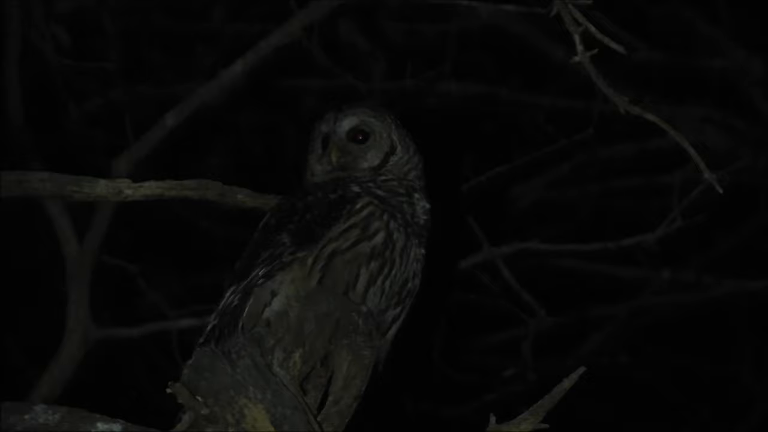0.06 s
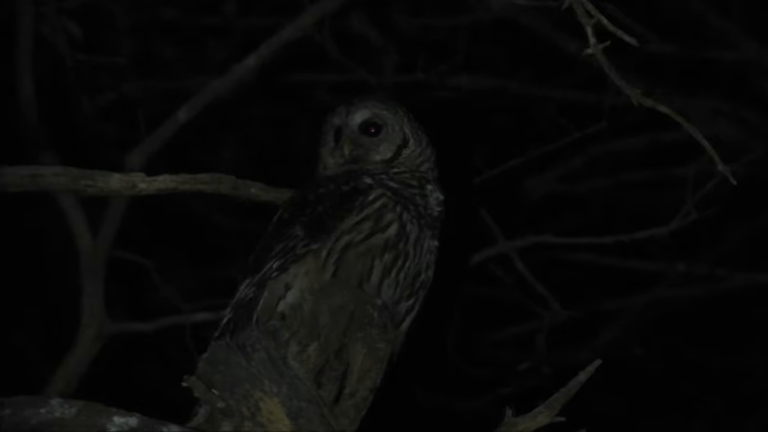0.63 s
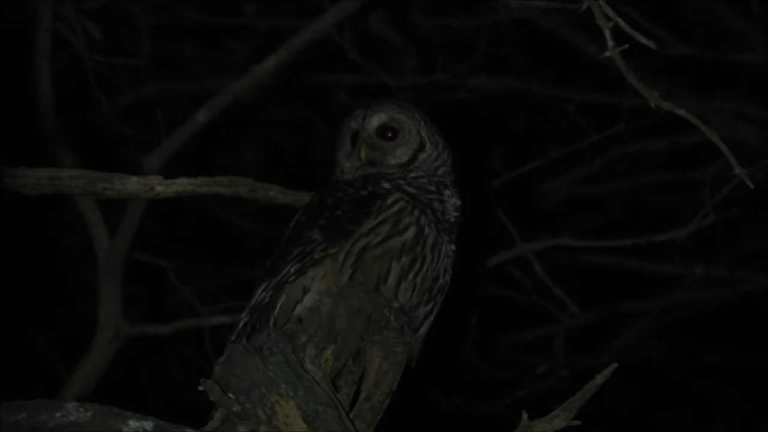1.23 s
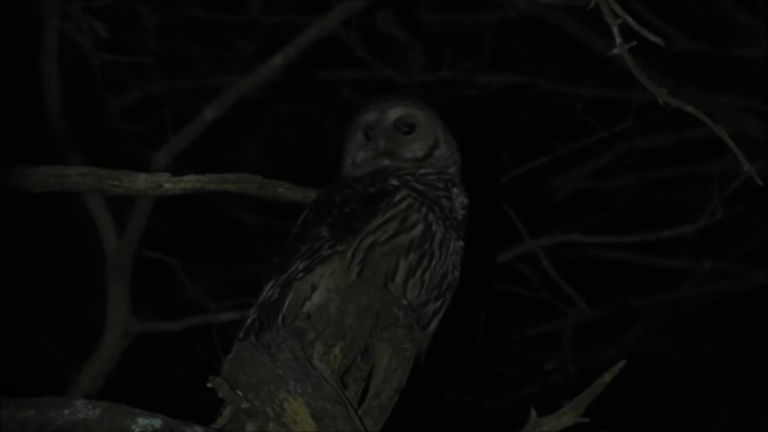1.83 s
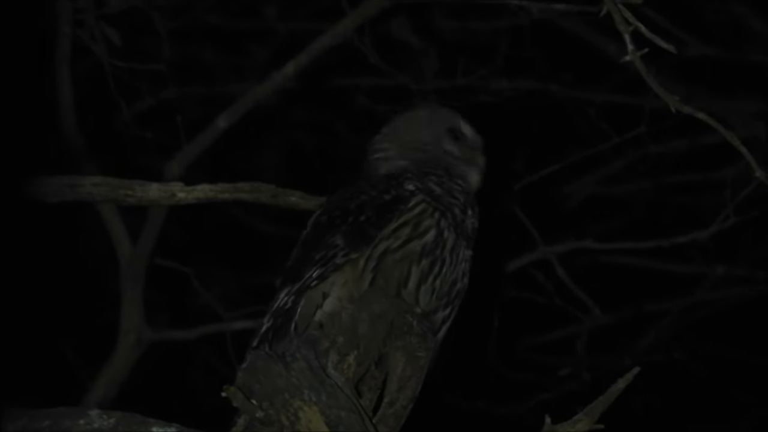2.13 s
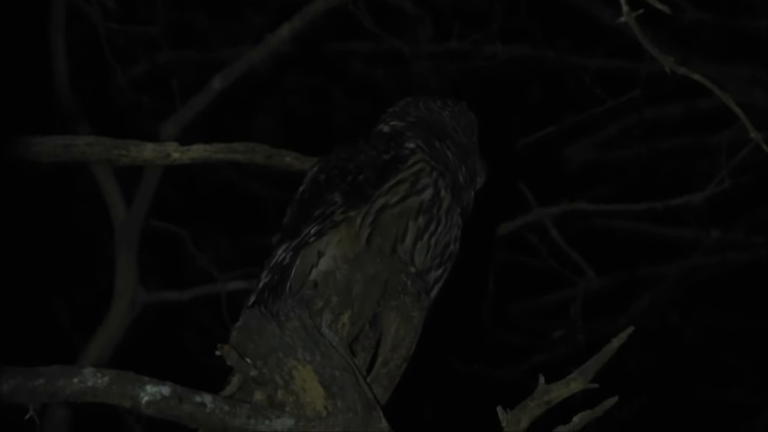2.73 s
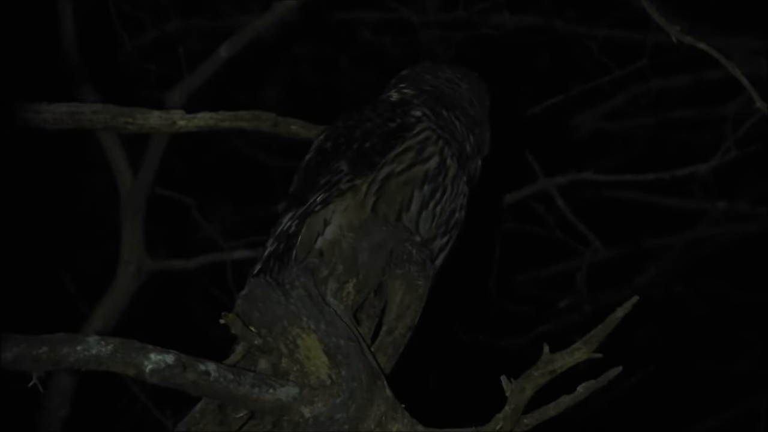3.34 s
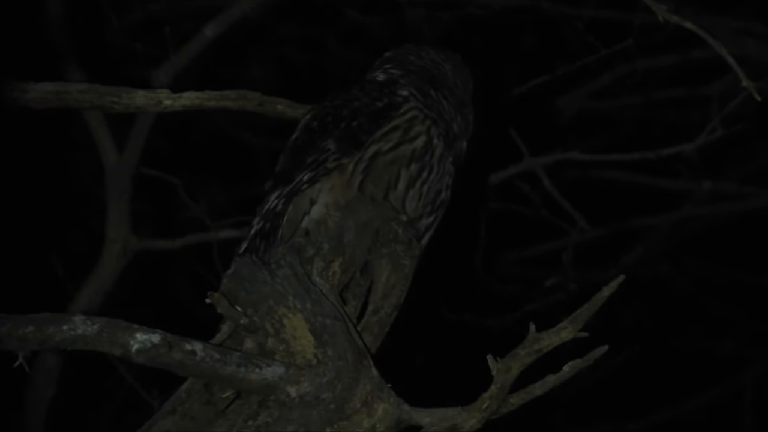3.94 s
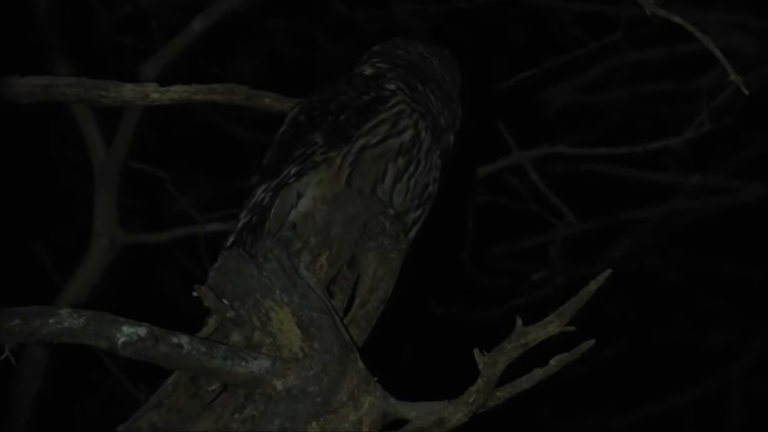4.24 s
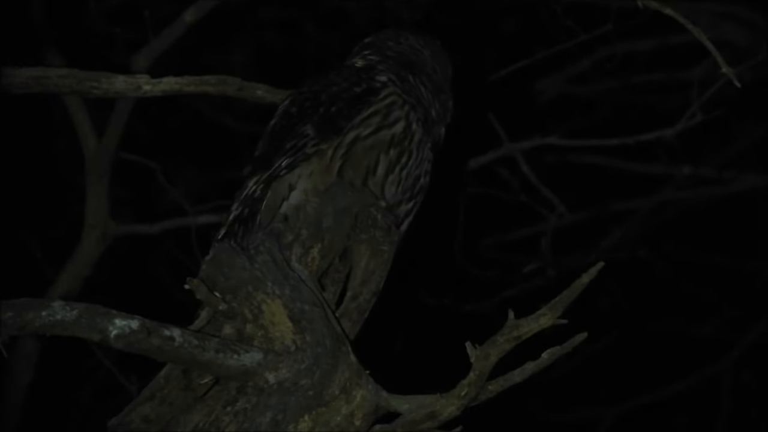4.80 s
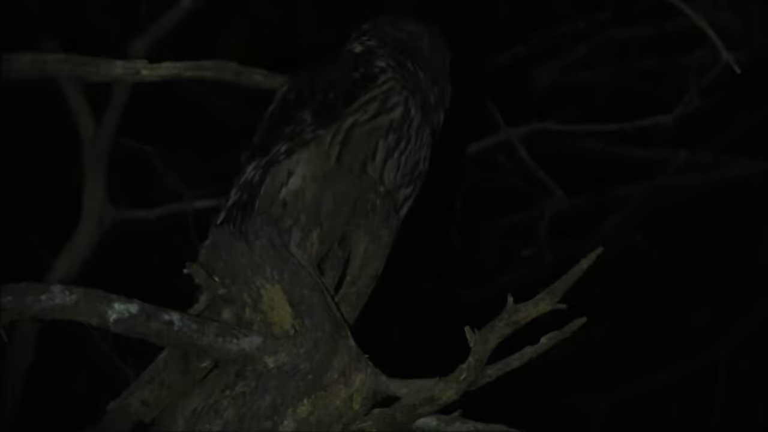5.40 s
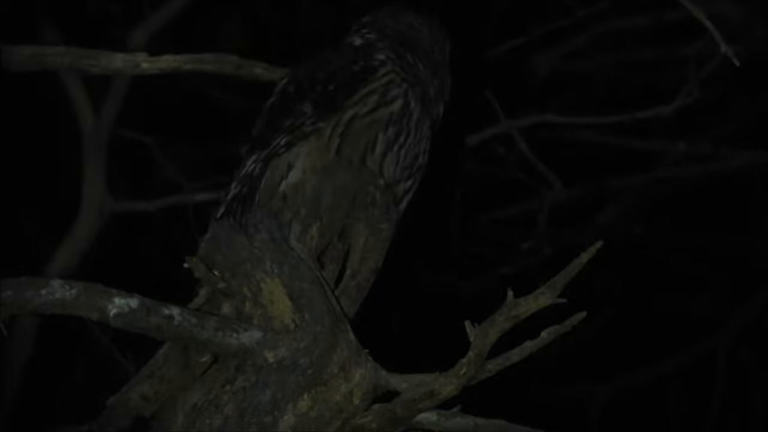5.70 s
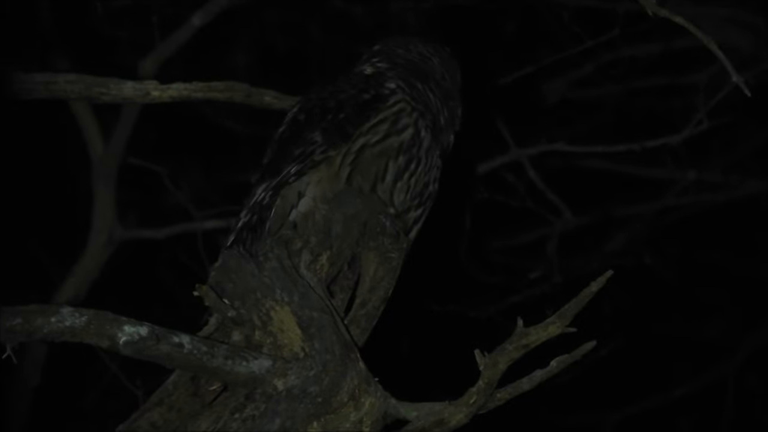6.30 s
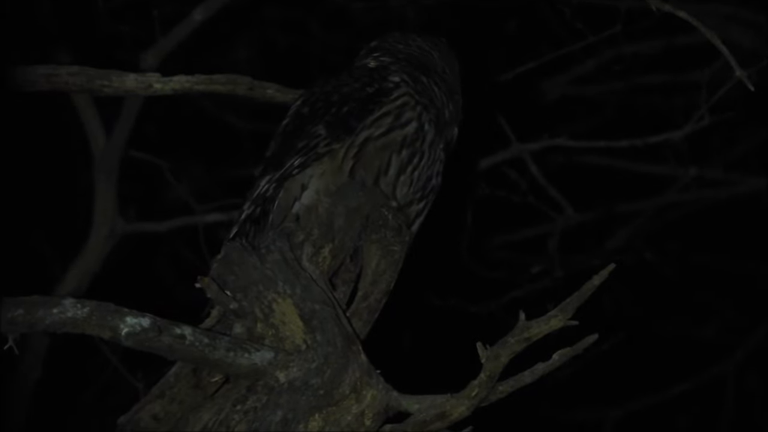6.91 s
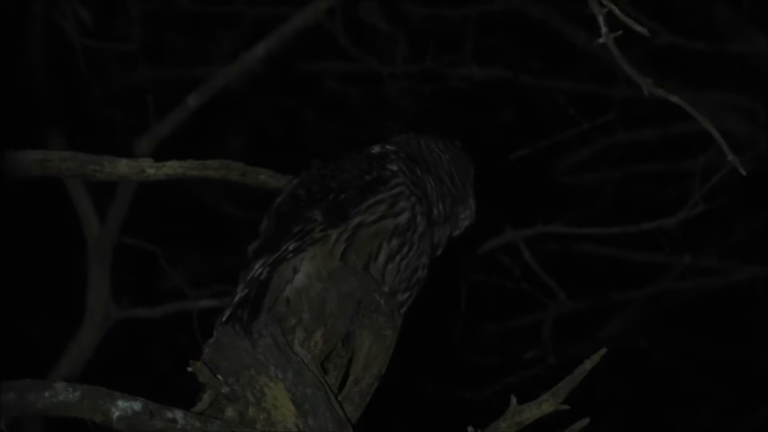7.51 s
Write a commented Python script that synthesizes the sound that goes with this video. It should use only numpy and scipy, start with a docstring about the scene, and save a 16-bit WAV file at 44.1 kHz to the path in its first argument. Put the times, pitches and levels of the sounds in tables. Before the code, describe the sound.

A small zoom motor whirs unevenly next to a stereo microphone for about a second, while frogs are already peeping in the surrounding night woods. Their brief, shrill, upward whistles alternate and overlap from different distances, each leaving an echoing tail. The nearest frog sounds only once, after about five seconds. A faint far chorus, distant rumble, light hiss and softly swelling background noise continue throughout.

```python
"""A wood at night, on a camera's stereo microphone. From the start, over a low distant rumble, faint hiss
and a soft low-mid noise that swells and dips, spring peepers call in turn against a faint far chorus.
Through the first second the zoom motor whines, right by the microphone. Then the frogs carry on, six in
all, near and far: each peep is a short rising whistle from a vocal sac, which the trees scatter into a
long tail. The nearest frog calls just once, at about 5.4 s."""
import sys
import numpy as np
from scipy import signal
from scipy.fft import rfft, irfft, next_fast_len
from scipy.io import wavfile

SR = 44100
rng = np.random.default_rng(int(sys.argv[2]) if len(sys.argv) > 2 else 0)


def transcribe(u):
    """Save the signal u as a 16-bit wav file named by the first command-line argument.

    u: samples, shape (n,) or (channels, n), limited to [-1, 1]; the rate is SR.
    q: integer samples, one column per channel.
    """
    v = np.clip(np.atleast_2d(u).T, -1, 1)
    q = np.round(v * 32767).astype(np.int16)
    wavfile.write(sys.argv[1], SR, q)


N = 332955


def gain_of(db):
    """Decibels to amplitude."""
    return 10 ** (np.asarray(db) / 20)


def unit_rms(x):
    """Scales to rms 1."""
    return x / np.sqrt(np.mean(x ** 2) + 1e-20)


def at_hz(points, hz):
    """Reads a table on a log-frequency axis."""
    f, value = np.transpose(points)
    return np.interp(np.log(hz + 1), np.log(f + 1), value)


def add(mix, s, sound):
    """Mixes a sound in at s seconds."""
    part = mix[max(round(s * SR), 0):][:len(sound)]
    part += sound[:len(part)]


def drift(count, rate_hz):
    """A slow random wander of rms 1."""
    hz = np.fft.rfftfreq(count, 1 / SR)
    lowpass = np.exp(-(hz / rate_hz) ** 2) * (hz > 0)
    return unit_rms(irfft(rfft(rng.standard_normal(count)) * lowpass, count))


def mic_ports(x, balance_db, lead_rad):
    """The two microphone ports hear a sound with a level and phase difference."""
    side = np.array([[.5], [-.5]])
    return (signal.hilbert(x) * unit_rms(gain_of(side * balance_db)) * np.exp(1j * side * lead_rad)).real


# likeness of left and right at the microphone: f/Hz, correlation/0-1
MIC_LIKENESS = [(25, 1), (80, 0.86), (170, 0.76), (330, 0.4), (700, 0.42), (1400, 0.14), (4000, 0.06),
                (8000, 0)]
def stereo_noise(spectrum):
    """Two-channel noise of rms 1, nearly mono in the bass."""
    hz = np.fft.rfftfreq(N, 1 / SR)
    left, other = rfft(rng.standard_normal((2, N)))
    same = at_hz(MIC_LIKENESS, hz)
    right = same * left + np.sqrt(1 - same ** 2) * other
    return unit_rms(irfft(np.array([left, right]) * gain_of(at_hz(spectrum, hz)), N))


# spectrum of the rumble: f/Hz, relative level/dB
RUMBLE_SPECTRUM = [(12, -40.5), (25, -5.5), (35, -6), (70, 0), (120, -2.5), (160, -2), (205, -6),
                   (265, -19.5), (420, -28), (600, -41), (1000, -86.5)]
def distant_rumble(level_db=-50.5):
    """A steady low rumble from far off."""
    return gain_of(level_db) * stereo_noise(RUMBLE_SPECTRUM)


# spectrum of the microphone's hiss: f/Hz, relative level/dB
HISS_SPECTRUM = [(300, 0.5), (1500, -4), (2500, -1.5), (3700, 1), (4800, 1), (7000, -1.3), (9000, -3.5),
                 (12000, -8), (15800, -11)]
def mic_hiss(level_db=-55.5):
    """The microphone's own faint, nearly steady hiss."""
    return stereo_noise(HISS_SPECTRUM) * gain_of(level_db + .17 * drift(N, 14))


# spectrum of the low-mid background noise: f/Hz, relative level/dB
BACKGROUND_SPECTRUM = [(130, -12.5), (280, 2), (550, 0), (900, -0.5), (1300, -6), (2200, -9.5), (4000, -15),
                       (9000, -43.5)]
# its swells and dips, of which only the swing about the mean is used, widened below: t/s, level/dB
BACKGROUND_LEVEL = [(1.1, -63.5), (1.35, -59.5), (1.5, -72.7), (1.62, -62.5), (1.92, -72), (2.12, -61.1),
                    (2.75, -62.5), (2.97, -72.5), (3.1, -59.5), (3.95, -67.5), (4.65, -62.5), (4.87, -71),
                    (4.96, -60), (5.42, -71), (5.7, -60), (6.3, -67.5), (6.62, -60.5), (6.77, -67),
                    (6.91, -57.5), (7.02, -66.0), (7.55, -69.5)]
def background_noise(level_db=-63.5, widen=1.385, flicker_db=1.65):
    """A soft low-mid background noise that swells and dips."""
    contour_db = np.interp(np.arange(N) / SR, *np.transpose(BACKGROUND_LEVEL))
    swell_db = widen * (contour_db - contour_db.mean())
    return stereo_noise(BACKGROUND_SPECTRUM) * gain_of(level_db + swell_db + flicker_db * drift(N, 13))


def far_chorus(level_db=-65, centre_hz=3150, width_hz=240, swell_db=2):
    """Frogs deeper in the wood blur into a faint band at the peeps' pitch."""
    hz = np.fft.rfftfreq(N, 1 / SR)
    band = np.exp(-((hz - centre_hz) / width_hz) ** 2 / 2)
    chorus = unit_rms(irfft(rfft(stereo_noise(HISS_SPECTRUM)) * band, N))
    return gain_of(level_db + swell_db * drift(N, 9)) * chorus


# motor speed, heard as the whine's pitch: t/s, f/Hz
MOTOR_PITCH = [(0, 706), (.09, 720), (.2, 686), (.24, 627.5), (.58, 631), (.63, 659.5), (.8, 645.7),
               (.88, 659), (.95, 706.5), (1.04, 697.5)]
# the whine's fundamental, before trim and flutter: t/s, level/dB
MOTOR_LEVEL = [(0, -67), (.2, -55.5), (.32, -72), (.37, -50), (.44, -63), (.53, -67.5), (.59, -50),
               (.64, -59), (.8, -47.5), (.84, -55.5), (.95, -46.5), (1.04, -51.5)]
# the whine's overtones: multiple of the pitch, relative level/dB
MOTOR_OVERTONES = [(2, -3.5), (3, -8.5), (4, -12.5), (8, -18.5), (9, -10.5), (10, -9)]
# hiss of the gears: t/s, level/dB
GEAR_HISS = [(0, -58), (.3, -73), (.58, -62.5), (.75, -55.5), (.93, -57), (1.04, -58.5)]
# resonances of the lens barrel: f/Hz, width/Hz, relative level/dB
BARREL_MODES = [(330, 180, 1.5), (970, 1430, -4.5), (2704, 300, 2), (4080, 910, -7), (5170, 400, -8),
                (5900, 350, -4), (6560, 410, 1)]
def zoom_motor(trim_db=-.5, overtone_db=-59.5, jitter=0.011, flutter_db=2.5, stop_s=1.05, fade_s=0.0217):
    """Beside the microphone a small motor of uneven speed whines, and its gears hiss in the lens barrel."""
    t, hz = np.arange(N) / SR, np.fft.rfftfreq(N, 1 / SR)
    pitch_hz, level_db, gear_db = (np.interp(t, *np.transpose(curve))
                                   for curve in (MOTOR_PITCH, MOTOR_LEVEL, GEAR_HISS))
    phase = 2 * np.pi * np.cumsum(pitch_hz * (1 + jitter * drift(N, 66.4))) / SR
    whine = unit_rms(np.sin(phase)) * gain_of(level_db + trim_db + flutter_db * drift(N, 31.3))
    overtones = unit_rms(sum(gain_of(db + flutter_db * drift(N, 21)) * np.sin(k * phase)
                             for k, db in MOTOR_OVERTONES))
    upper_db = overtone_db + 0.423 * (level_db - level_db.max())  # they swell with the whine, but less
    barrel = sum(gain_of(db) / (1 + (2 * (hz - f) / width) ** 2) for f, width, db in BARREL_MODES)
    pulsed_noise = rng.standard_normal(N) * (1 + np.cos(phase))
    gears = unit_rms(irfft(rfft(pulsed_noise) * barrel, N))
    sound = whine + overtones * gain_of(upper_db) + gears * gain_of(gear_db)
    return sound * np.clip((stop_s - t) / fade_s, 0, 1)


# how long the wood rings: f/Hz, time to fall 60 dB/s
WOOD_DECAY = [(1500, 0.61), (3100, 1.03), (4700, 0.34), (6500, 0.3), (9000, .3)]
def tree_echoes(x, envelope, same, trunks_per_s=130, leaves_db=-24):
    """Single echoes off trunks in a haze off twigs and leaves; the high treble dies first."""
    trunks = rng.random(len(envelope)) < trunks_per_s / SR
    strength = gain_of(leaves_db) + trunks * np.sqrt(SR / trunks_per_s) / 10
    left, other = rng.standard_normal((2, len(envelope))) * strength
    right = same * left + np.sqrt(1 - same ** 2) * other
    hz, t, spectra = signal.stft(np.array([left, right]) * envelope, SR, nperseg=256)
    decay = gain_of(-60 * t / at_hz(WOOD_DECAY, hz)[:, None])
    tail = signal.istft(spectra * decay, SR, nperseg=256)[1]
    peep_band = abs(np.fft.rfftfreq(tail.shape[1], 1 / SR) - 3150) < 350
    tail /= np.sqrt(np.mean(abs(rfft(tail)[:, peep_band]) ** 2))  # keeps the power at the peeps' pitch
    return signal.fftconvolve(x[None], tail, axes=1)[:, :len(x)]


def ground_bounce(x, echo_db, notch_hz, rough_delay_s=.006):
    """The ground echo is an odd number of half cycles late at one pitch, so the whistle dips there."""
    hz = np.fft.rfftfreq(len(x), 1 / SR)
    delay_s = (round(rough_delay_s * notch_hz) + .5) / notch_hz
    echo = gain_of(echo_db) * np.exp(-2j * np.pi * hz * delay_s)
    return irfft(rfft(x) * (1 + echo), len(x))


# each frog's voice: pitch rise/Hz, arch of the rise/0-1, swell over the peep/dB,
# third and fourth harmonic at mid-peep/dB
FROG_VOICES = {"long": (378, 0.58, -7.5, -20.5, -24.5), "low": (215, 0.3, 0.5, -29.5, -34),
               "high": (361.5, 0.68, -8, -27, -28), "short": (268, 0.69, -5, -15, -26.5),
               "far": (333, 0.6272, -6, -20, -23.5), "near": (218, 0.6, -1, -37, -46)}
def peep(frog, length_s, start_hz, attack_s=0.0065, release_s=0.0148, waver=0.0042, brighten_db=6):
    """A rising whistle that brightens as it goes: the vocal sac radiates mostly the second harmonic."""
    rise_hz, arch, swell_db, third_db, fourth_db = FROG_VOICES[frog]
    t = np.arange(0, length_s, 1 / SR)
    progress = t / length_s
    hz = start_hz + rise_hz * (progress + arch * progress * (1 - progress))
    hz *= 1 + waver * drift(len(t), 110)
    phase = np.pi * np.cumsum(hz) / SR  # the folds vibrate an octave below the heard pitch
    attack = 1 - np.exp(-t / attack_s)
    release = np.sin(np.pi / 2 * np.clip((length_s - t) / release_s, 0, 1)) ** 2
    whistle = gain_of(swell_db * (progress - .5)) * np.sin(2 * phase)
    weak_harmonics = [(1, third_db - 17), (3, third_db), (4, fourth_db), (5, fourth_db - 15)]
    edge = sum(gain_of(db) * np.sin(k * phase) for k, db in weak_harmonics)
    edge *= gain_of(brighten_db * (progress - .5))
    return np.sqrt(2) * attack * release * (whistle + edge)


# each frog's perch, heard from the microphone: left over right/dB, left lead/rad, ground echo/dB,
# its notch f/Hz, build-up of the wood's echo/s (sign ignored)
FROG_PERCHES = {"long": (2, 0.67, -8.5, 3080.5, 0.07), "low": (6, 0.4, -12, 2934, 0.09),
                "high": (3.5, 0.6735, -1.5, 3369, 0.04), "short": (5, 0.9465, -25.5, 3202, -0.04),
                "far": (3.5, 0.74, -15, 3200, 0.1), "near": (0, 0.01, -29, 3200, -0.1)}
# one row a peep, levels before the trims: t/s, frog, length/s, starting f/Hz, direct level/dB,
# scattered level/dB
FROG_CALLS = [(-0.2, "long", .18, 2900, -34, -51), (-0.07, "high", 0.17, 3152, -49, -48.5),
              (0.356, "short", 0.1118, 3004, -47.5, -43), (0.526, "far", 0.19, 3003, -57.5, -46.5),
              (0.834, "long", .125, 2880, -45, -49), (1.003, "high", .16, 3120, -45, -43),
              (1.54, "far", 0.11, 3010, -54.5, -48), (1.669, "short", 0.091, 2995, -44, -42.5),
              (1.8, "low", 0.082, 2851, -30, -42), (1.837, "long", .14, 2920, -39.5, -40.5),
              (1.863, "high", .13, 3130, -48, -44), (2.407, "far", 0.15, 3022, -55.5, -46),
              (2.545, "short", 0.1083, 3029, -46.5, -43), (2.772, "long", 0.1725, 2921, -38, -43.5),
              (2.818, "high", 0.15, 3142, -49, -44), (2.904, "low", 0.1, 2825, -31.5, -42.5),
              (3.195, "far", 0.163, 2990, -55.5, -46), (3.319, "short", 0.14, 3006, -45, -44.5),
              (3.625, "high", 0.13, 3120, -44.5, -43.5), (3.779, "long", .18, 2905, -39, -41),
              (4.014, "low", 0.09486, 2829, -32.5, -41), (4.088, "far", .15, 3007, -51.5, -53.5),
              (4.176, "short", 0.11, 3005, -48, -41.5), (4.387, "high", .13, 3159, -46.5, -42.7),
              (4.895, "far", 0.16, 2999, -54, -48.5), (5.022, "short", .12, 3030, -47.5, -44.5),
              (5.183, "low", 0.087, 2835, -34.5, -40), (5.229, "high", .136, 3118, -45, -43.6),
              (5.361, "long", 0.17, 2890, -37.5, -42.5), (5.379, "near", .081, 3105, -24, -37),
              (5.715, "far", .12, 2986, -54, -44.5), (5.85, "short", 0.1197, 3008, -43.5, -44.5),
              (6.063, "low", 0.085, 2845, -32, -39.5), (6.132, "high", 0.15, 3138, -46.5, -42.5),
              (6.244, "long", 0.17, 2915, -40, -39), (6.546, "far", .16, 3011, -57, -48.5),
              (6.666, "short", .11, 3000, -44, -42.5), (6.945, "high", .133, 3129, -44, -42),
              (7.092, "long", 0.1826, 2910, -40, -40), (7.32, "low", .105, 2868, -32.5, -38.5),
              (7.487, "short", 0.091, 3015, -43.5, -49)]
def peepers(direct_trim_db=2.0, wood_trim_db=-0.26, branches_db=-13, branch_decay_s=.012):
    """Each frog reaches the microphone directly, off the ground and branches, and through the wood."""
    t = np.arange(SR) / SR
    branch_envelope = np.exp(-t[:SR // 10] / branch_decay_s)
    total = next_fast_len(N + SR, real=True)  # starts one second early, for peeps already ringing
    mix = np.zeros((2, total))
    for perched, (balance_db, lead_rad, ground_db, notch_hz, build_up_s) in FROG_PERCHES.items():
        left, right, scattered = np.zeros((3, total))
        for s, frog, length_s, start_hz, direct_db, scattered_db in FROG_CALLS:
            if frog == perched:
                call = peep(frog, length_s, start_hz)
                for channel, heard in zip((left, right), mic_ports(call, balance_db, lead_rad)):
                    add(channel, s + 1, gain_of(direct_db + direct_trim_db) * heard)
                add(scattered, s + 1, gain_of(scattered_db + wood_trim_db) * call)
        mix += [ground_bounce(channel, ground_db, notch_hz) for channel in (left, right)]
        mix += gain_of(branches_db) * tree_echoes((left + right) / 2, branch_envelope, same=0.77)
        wood_tail = tree_echoes(scattered, 1 - np.exp(-(t / build_up_s) ** 2), same=.85)
        mix += mic_ports(wood_tail, balance_db=1.0, lead_rad=0.36)
    return mix[:, SR:SR + N]


def scene():
    """The night wood from where the camera stands."""
    return peepers() + far_chorus() + zoom_motor() + background_noise() + mic_hiss() + distant_rumble()


def record(dry):
    """The recorder passes nothing much above 15.8 kHz."""
    lowpass = signal.firwin(511, 15800, window=("kaiser", 9), fs=SR)
    return signal.oaconvolve(dry, lowpass[None], "same")


dry = scene()
out = record(dry)
transcribe(out)
```